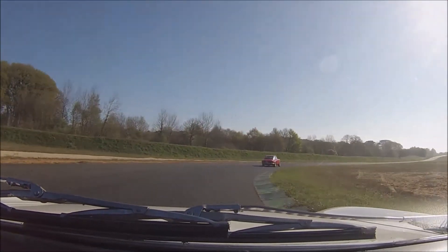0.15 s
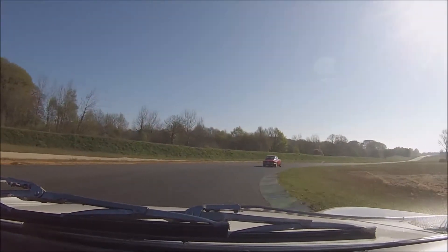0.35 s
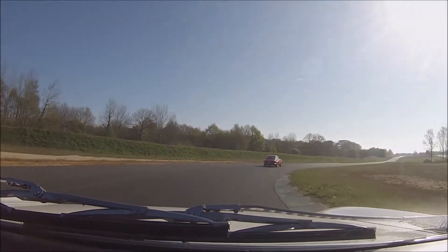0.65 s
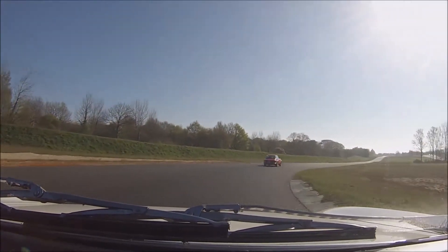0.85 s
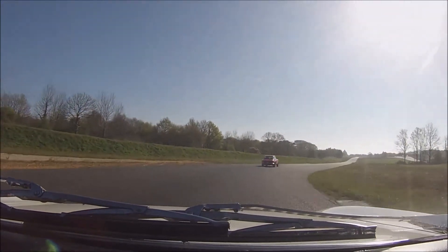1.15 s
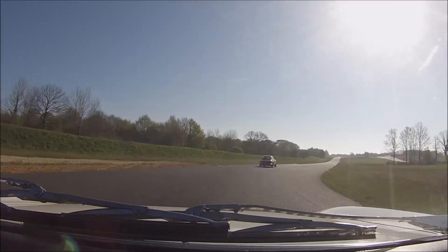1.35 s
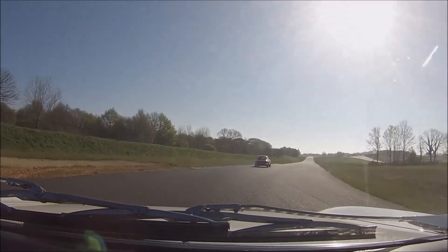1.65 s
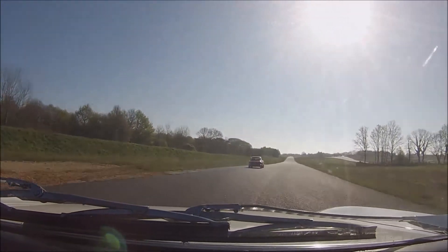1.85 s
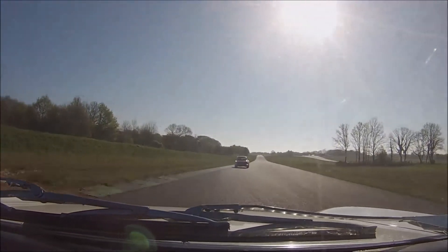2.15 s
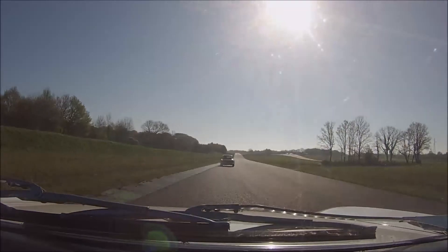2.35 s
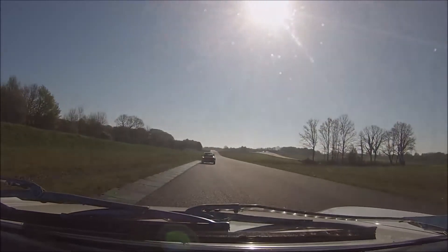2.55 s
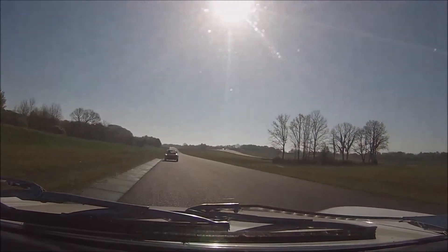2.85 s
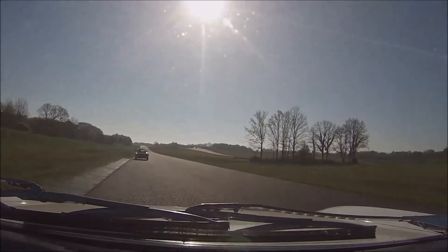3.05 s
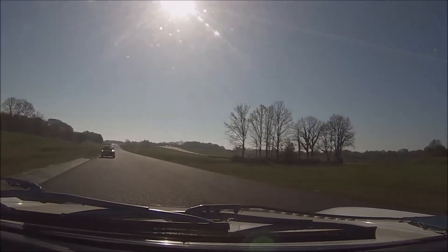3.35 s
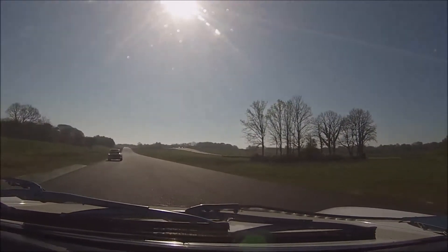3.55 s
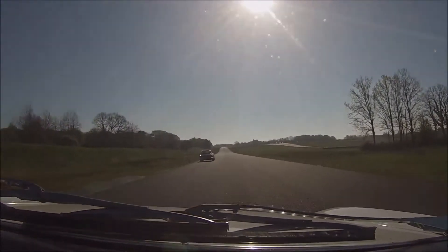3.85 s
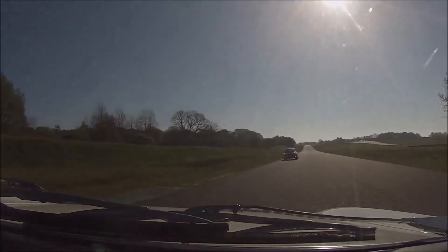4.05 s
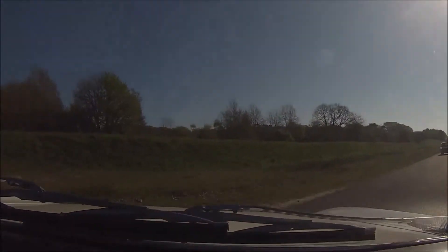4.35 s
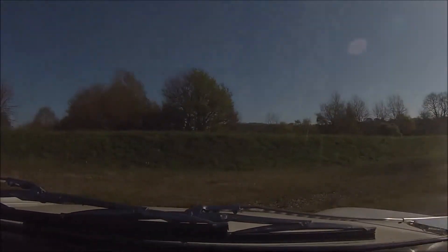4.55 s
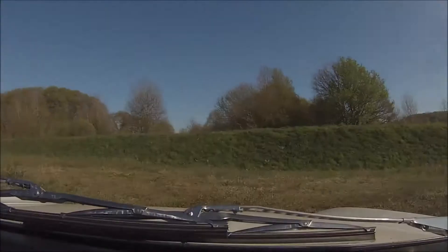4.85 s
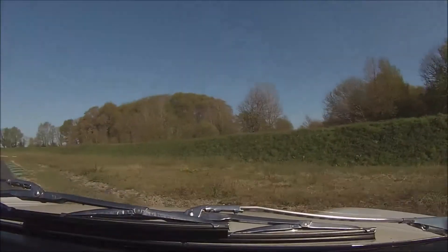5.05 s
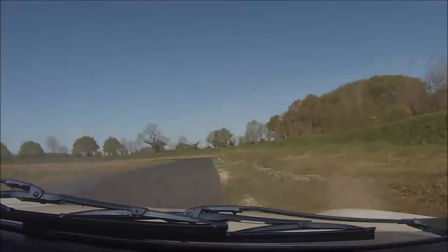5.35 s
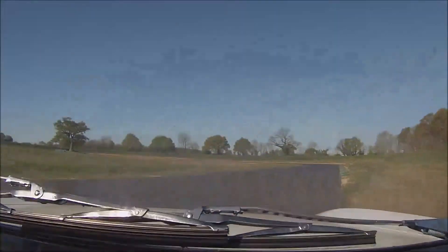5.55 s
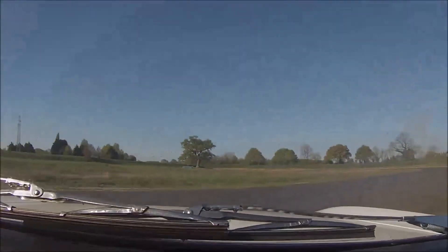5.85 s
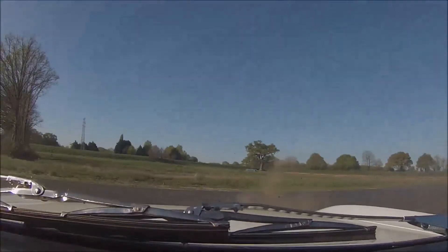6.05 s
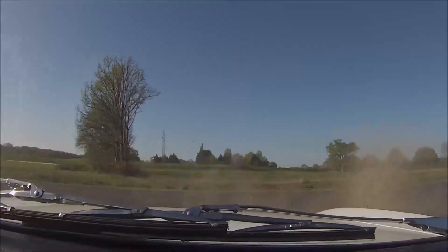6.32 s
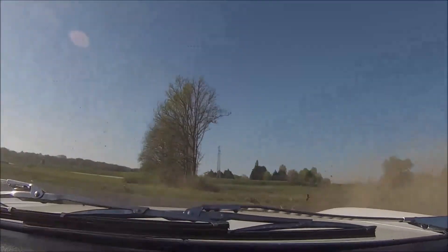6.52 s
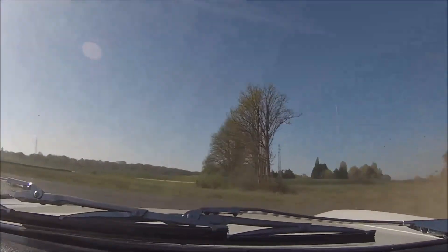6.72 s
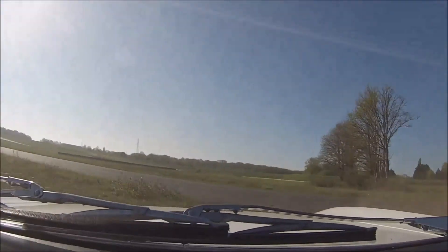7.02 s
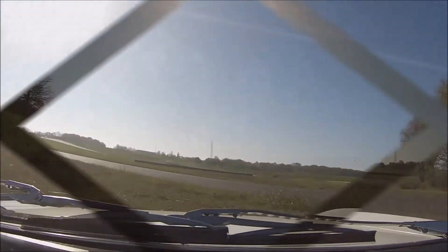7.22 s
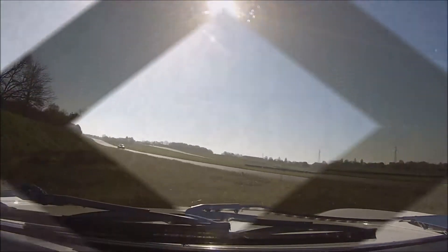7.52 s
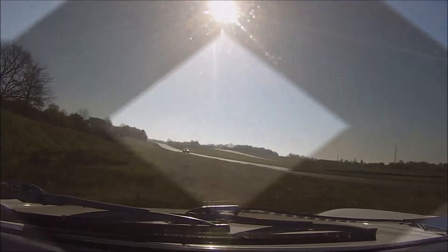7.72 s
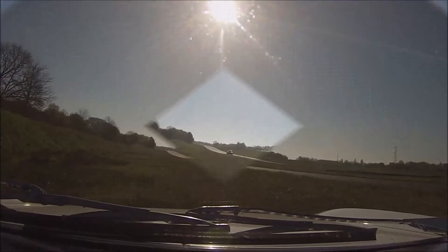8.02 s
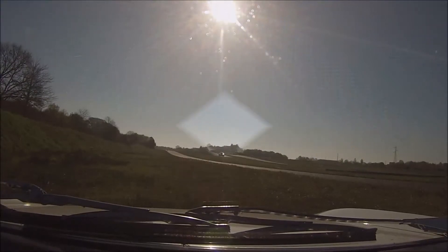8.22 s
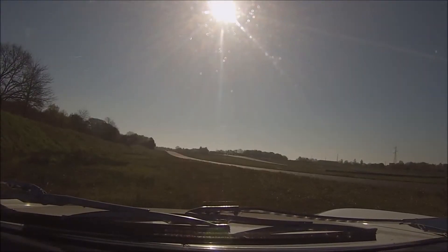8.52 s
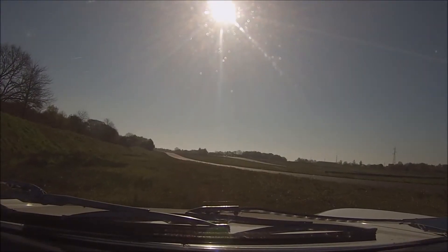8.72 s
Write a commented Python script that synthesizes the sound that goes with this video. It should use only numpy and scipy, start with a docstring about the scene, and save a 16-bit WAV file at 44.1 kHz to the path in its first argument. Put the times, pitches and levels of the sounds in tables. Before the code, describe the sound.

Heard from behind the windscreen of a small sports car on a circuit, a four-cylinder engine climbs steadily over cabin boom and tyre roar. The revs fall, a few knocks sound and the tyres squeal. A short groan leads into a hard jolt as the car slides onto rough ground. Grit patters while a plastic camera housing chatters loudly and close. The engine gives one low rev with light ticking, and a panel hums briefly.

```python
"""A four-cylinder engine climbs and falls, heard from a camera housing behind a car's windscreen.
Its firing note and fluttering weaker orders ride over cabin boom and the roar of tyres on a track.
The tyres stick and slip in a squeal, and the body groans just before the hardest jolt. The car slides
onto rough ground, grit patters and the closed plastic housing chatters in its mount. The engine is
revved once more, a loose part ticks along, and a panel hums at the end."""
import sys
import numpy as np
from scipy import signal
from scipy.fft import rfft, irfft
from scipy.io import wavfile
from scipy.ndimage import uniform_filter1d, minimum_filter1d

SR = 44100
rng = np.random.default_rng(int(sys.argv[2]) if len(sys.argv) > 2 else 0)


def int16_out(signal):
    """Quantize to a 16-bit WAV file."""
    q = np.round(np.clip(np.atleast_2d(signal).T, -1, 1) * 32767)
    wavfile.write(sys.argv[1], SR, q.astype(np.int16))


N = 391608
CONTACT_SAMPLES, ONSET_SAMPLE, LEAD_SAMPLES = 384, 8, 256  # the lead leaves room for filter pre-ring


def gain_of(db):
    """Decibels to amplitude."""
    return 10 ** (np.asarray(db) / 20)


def unit_rms(x):
    """Scales a signal to an rms of 1."""
    return x / np.sqrt(np.mean(x ** 2) + 1e-20)


def curves(rows):
    """A table's start sample, then its columns as sample-by-sample automation."""
    times, *columns = np.transpose(rows)
    start = int(np.clip(times[0] * SR, 0, N))
    t = np.arange(start, min(int(times[-1] * SR), N)) / SR
    return (start, *(np.interp(t, times, column) for column in columns))


def add(mix, start, sound):
    """Lays a sound into the mix from a start sample."""
    part = mix[start:][:len(sound)]
    part += sound[:len(part)]


def place(sounds, times, peak_db, early_samples):
    """A track of one-shots, each set to its peak level and laid just ahead of its cue."""
    track = np.zeros(N)
    for at, sound, db in zip(times, sounds, peak_db):
        add(track, round(at * SR) - early_samples, sound * gain_of(db) / abs(sound).max())
    return track


def wander(size, hz):
    """Smooth random modulation with an rms of 1, mostly slower than hz."""
    drift = signal.lfilter(*signal.butter(2, hz, fs=SR), rng.standard_normal(size + SR))
    return unit_rms(drift[SR:])


def equalise(x, points, peaks=()):
    """Shapes x with an EQ curve and resonant bells."""
    size = x.shape[-1]
    hz = np.fft.rfftfreq(size, 1 / SR)
    point_hz, point_db = np.transpose(points)
    db = np.interp(np.log(hz + 1), np.log(point_hz + 1), point_db, left=-90, right=-90)
    db += sum(lift_db / (1 + (2 * (hz - at) / width) ** 2) for at, width, lift_db in peaks)
    return irfft(rfft(x) * gain_of(db), size)


def soften(x, cutoff_hz):
    """A yielding contact carries little treble."""
    return signal.sosfilt(signal.butter(6, cutoff_hz, fs=SR, output="sos"), x)


def pitched_noise(hz, width_hz):
    """A noise band that follows a pitch curve: shifted down to zero, smoothed and shifted back."""
    carrier = np.exp(2j * np.pi * np.cumsum(hz) / SR)
    pole = np.exp(-np.pi * width_hz / SR)
    band = rng.standard_normal(len(hz)) / carrier
    for _ in range(2):
        band = signal.lfilter([1 - pole], [1, -pole], band)
    return unit_rms((carrier * band).real)


def ringing(modes):
    """Impulse response of dying modes."""
    t = np.arange(4096) / SR
    return sum(gain_of(db - 60 * t / t60) * np.sin(2 * np.pi * hz * t) for hz, db, t60 in modes)


def contacts(count, scatter_s, firmness):
    """One row a hit: a first contact and a brief scatter of smaller ones that swells and dies."""
    t = np.arange(CONTACT_SAMPLES) / SR
    hits = rng.standard_normal((count, len(t))) * np.exp(-t / scatter_s) * np.minimum(t / .001, 1)
    hits /= np.linalg.norm(hits, axis=1)[:, None]
    hits[:, ONSET_SAMPLE] += firmness
    return hits


def bounced(hits):
    """Each hit bounces once, 3-8 ms later and 8-18 dB softer."""
    lateness, strength = rng.random((len(hits), 2)).T
    delay = (SR * (.003 + .005 * lateness)).astype(int)
    index = np.arange(hits.shape[1]) - delay[:, None]
    bounce = np.take_along_axis(hits, np.maximum(index, 0), axis=1) * (index >= 0)
    return hits - gain_of(-18 + 10 * strength)[:, None] * bounce


def struck(hits, modes, detune, spread_db, lift_db=0, grip_s=.004, grip_db=-10):
    """Each hit lands elsewhere, retuning and reweighting the modes; the mount's grip chokes them."""
    hz, db, t60 = np.transpose(modes)
    shift, luck = rng.standard_normal((len(hits), len(hz), 2)).transpose(2, 0, 1)
    t = np.arange(2048) / SR
    envelopes = gain_of(db + lift_db + spread_db * luck)[..., None] * gain_of(-60 * t / t60[:, None])
    detuned_hz = hz * (1 + detune * shift)
    rings = (envelopes * np.sin(2 * np.pi * detuned_hz[..., None] * t)).sum(axis=1)
    choke = gain_of(grip_db * (1 - np.exp(-(t / grip_s) ** 2)))
    fade = np.cos(np.pi / 2 * t / t[-1])
    return signal.fftconvolve(hits, rings * choke * fade, axes=1)


# Sub-bass bed of the cabin air: (time [s], pitch [Hz], relative level [dB])
BOOM = [(0, 49.7, -17.5), (0.551, 42, -13), (0.803, 48.17, -18.5), (1.209, 51.66, -11), (1.35, 51.22, -21),
        (1.599, 56.18, -10), (2.051, 42.06, -14), (2.419, 42.16, -16.5), (2.601, 50.18, -15.5),
        (3.299, 40.92, -13), (3.799, 43.8, -18), (3.91, 40, -5), (3.999, 40.6, -22), (4.33, 43.2, -2),
        (4.6, 44.53, -18.5), (4.8, 48.1, -6), (4.918, 53.08, -18), (5.179, 48.3, -13.5),
        (5.261, 47.63, -13.5), (5.7, 43.55, -14.5), (6.472, 38.24, -17.5), (6.748, 39.27, -11.5),
        (6.998, 45.1, -17.5), (7.3, 48.6, -10.5), (7.621, 41.78, -9), (7.701, 41.77, -27),
        (7.859, 40.94, -7.5), (8.001, 43.95, -17.5), (8.252, 44, -18), (8.48, 44.64, -13.5),
        (8.88, 39.4, -8.5)]


def cabin_boom(trim_db=-3):
    """The cabin air throbs, wavering in pitch and strength; returns the sound and its level curve."""
    times, hz, db = np.transpose(BOOM)
    t = np.arange(N) / SR
    hz, db = np.interp(t, times, hz), np.interp(t, times, db)
    phase = 2 * np.pi * np.cumsum(hz + 2.22 * wander(N, 4.24)) / SR
    swell = unit_rms(gain_of(.5 * np.clip(wander(N, 3.7), -3, 1.3)))
    return np.sqrt(2) * gain_of(db + trim_db) * swell * np.sin(phase), db


# Tyre roar level: swells through the skid, ducks sharply at the hardest jolt, then partly returns:
# (time [s], level [dB])
ROAR_LEVEL = [(0, -34), (0.901, -34), (1.9, -34), (2.3, -36), (2.9, -34.5), (3.6, -38), (3.95, -30.5),
              (4.301, -31.5), (4.8, -30.5), (5.19, -29.5), (5.27, -49.5), (5.6, -37.5), (6.1, -43.5),
              (6.3, -40.5), (7.0, -43.5), (7.35, -36), (7.7, -45.5), (7.9, -38.5), (8.2, -40), (8.88, -43)]
# Low-end EQ of the body rumble: (frequency [Hz], gain [dB])
RUMBLE_EQ = [(15, 1), (28, 6), (38, 7.5), (58, 10), (72, -2.5), (110, -9), (150, -7.5), (237, -7),
             (330, -15), (420, -27), (550, -33.5)]
# Tone of the roar on asphalt: (frequency [Hz], gain [dB])
ASPHALT_EQ = [(250, 3.5), (350, 3.5), (700, -9), (850, -17.5), (1750, -14.5), (2750, -21.5), (3100, -58.5)]
# Its midrange resonances: (centre [Hz], width [Hz], boost [dB])
ASPHALT_PEAKS = [(466, 210, 6.5), (621, 216, 11.5), (1164, 287, 21), (1470, 250, 11), (2010, 210, 8),
                 (2523, 680, 16.5)]
# Duller, less resonant roar off the asphalt: (frequency [Hz], gain [dB])
SOIL_EQ = [(250, 10), (350, -4), (600, 1.5), (900, -16), (1200, -7), (1600, -15), (2000, -15.5),
           (2700, -18.5), (3100, -50)]
# Air hiss on top: (frequency [Hz], gain [dB])
HISS_EQ = [(2500, -2), (2900, 8), (3100, 4), (3500, 10), (3900, 1.5), (5000, -1), (6500, -1.5),
           (7500, -10.5), (9200, -10), (10400, -12), (12000, -19.5), (14000, -23), (16000, -40.5)]


def road_noise(boom, boom_db, off_road_s=6.5):
    """Body rumble, tyre roar and air hiss; the cabin's throb shakes roar and hiss in its rhythm."""
    t = np.arange(N) / SR
    roar_db = np.interp(t, *np.transpose(ROAR_LEVEL))
    shake_db = 6 * boom + wander(N, 22)
    rumble = unit_rms(equalise(rng.standard_normal(N) * gain_of(2.8 * wander(N, 16.5)), RUMBLE_EQ))
    rumble_db = -4 + .23 * boom_db + .26 * roar_db  # partly follows boom and roar
    rush = rng.standard_normal(N) * gain_of(shake_db)
    asphalt = unit_rms(equalise(rush, ASPHALT_EQ, ASPHALT_PEAKS))
    soil = unit_rms(equalise(rush, SOIL_EQ))
    roar = np.where(t < off_road_s, asphalt, soil)
    hiss = unit_rms(equalise(rng.standard_normal(N) * gain_of(.92 * shake_db), HISS_EQ))
    hiss_db = np.minimum(roar_db, -34) - 20.5  # follows the roar up to a ceiling
    return gain_of(rumble_db) * rumble + gain_of(roar_db) * roar + gain_of(hiss_db) * hiss


# Stones thrown up from the verge: (time [s], density [hits/s], relative level [dB])
GRIT = [(5.21, 64, -84), (5.4, 51, -95), (5.6, 140, -65), (5.9, 100, -72), (6.05, 60, -86), (6.15, 97, -62),
        (6.9, 140, -81.5), (6.95, 82, -89), (7.08, 120, -98), (7.25, 200, -65), (7.68, 110, -63.5),
        (7.73, 60, -96), (7.85, 200, -69), (7.93, 60, -82), (8.2, 40, -92)]


def grit_patter(puff_s=.00093):
    """Stones patter at random on the underside, in the colours of the housing's crack and thud."""
    start, density, db = curves(GRIT)
    size = len(db)
    accent_db = 3 * np.minimum(rng.exponential(1, size), 3)
    impacts = gain_of(db + accent_db) * (rng.random(size) < density / SR)
    envelope = signal.lfilter([1], [1, -np.exp(-1 / (puff_s * SR))], impacts)
    puffs = rng.standard_normal(size) * envelope
    body = soften(signal.oaconvolve(puffs, ringing(MOUNT_MODES))[:size], cutoff_hz=1700)
    return start, equalise(puffs, CRACK_EQ, CRACK_PEAKS) + gain_of(17) * body


# Short sprays of grit: (time [s], relative level [dB], 60 dB decay [s], low cut [Hz])
SPRAYS = [(1.775, -52, .05, 3000), (2.652, -45, .05, 3000), (3.749, -41, 0.2, 4500), (3.84, -44.5, 1, 3000),
          (3.95, -30.5, 0.2, 2170), (4.075, -36.5, 0.13, 1904), (4.21, -49, 0.073, 3500),
          (4.455, -56, .08, 4000), (5.123, -47, 0.054, 3000), (5.154, -42, .06, 2200)]


def grit_spray(at, db, t60, low_hz):
    """Grit sprays against the car: a 0.2 s burst of hiss that starts at once and thins out."""
    t = np.arange(SR // 5) / SR
    band = signal.butter(3, [low_hz, 7500], "bandpass", fs=SR)
    burst = signal.lfilter(*band, rng.standard_normal(len(t)))
    sizzle = .085 * np.diff(rng.standard_normal(len(t) + 1))
    return round(at * SR), gain_of(db - 60 * t / t60) * (burst + sizzle)


# Thin metallic accents: (time [s], pitch [Hz], level [dB], 60 dB decay [s])
TINKS = [(3.75, 5877, -39, 0.055), (5.842, 9880, -58, 0.25), (7.896, 9910, -54, 0.31)]


def metal_tink(at, hz, db, t60):
    """A small jolted metal part rings with one dying tone."""
    t = np.arange(SR // 4) / SR
    attack = np.minimum(t / .003, 1)
    return round(at * SR), attack * gain_of(db - 60 * t / t60) * np.sin(2 * np.pi * hz * t)


# Sharp stone hits: (time [s], peak level [dB])
CLICKS = [(3.9499, -29), (5.2066, -42), (5.4555, -39), (5.7209, -32), (6.984, -33), (7.1091, -32),
          (7.2539, -48), (7.4696, -39), (7.86, -30)]
# Their wide, bright tone: (frequency [Hz], gain [dB])
CLICK_EQ = [(3000, -8), (6000, 2), (9000, -7), (13000, -9), (16300, -11)]


def stone_clicks():
    """Small stones hit glass or metal in very short contacts that do not ring."""
    times, db = np.transpose(CLICKS)
    hits = contacts(len(times), scatter_s=.0007, firmness=.5)
    clicks = equalise(np.pad(hits, ((0, 0), (LEAD_SAMPLES, 384))), CLICK_EQ)
    return place(clicks, times, db, LEAD_SAMPLES)


# Ticks of a loose part during the last rev: (time [s], relative level [dB])
TICKS = [(7.9175, -47), (7.9269, -51), (7.9463, -42), (7.9658, -44), (7.9842, -50), (8.0025, -46),
         (8.0196, -46), (8.0371, -49), (8.0552, -48), (8.0693, -53), (8.0833, -44), (8.1026, -44),
         (8.1194, -46), (8.1374, -46), (8.1538, -51), (8.1703, -49), (8.4713, -51)]
# Ring of the bright tick: (frequency [Hz], level [dB], 60 dB decay [s])
TICK_MODES = [(5340, -1, 0.00546), (4528, -4.5, 0.0053), (9900, -22, 0.012), (9200, -6, 0.0061),
              (3300, -12, 0.005), (2030, 6, 0.012)]
# Ring of the duller tock: (frequency [Hz], level [dB], 60 dB decay [s])
TOCK_MODES = [(2030, 1, .013), (2400, -6, .01), (1300, -5, .01), (5000, -21, .005)]


def loose_part(fall_back_s=.0075):
    """A loose part ticks brightly and falls back with a duller, stronger tap."""
    times, db = np.transpose(TICKS)
    tock_db = db + 6 + 3 * rng.standard_normal(len(times))

    def taps(cues, levels_db, modes, scatter_s, firmness):
        track = np.zeros(N)
        for at, level_db, hit in zip(cues, levels_db, contacts(len(cues), scatter_s, firmness)):
            add(track, round(at * SR) - ONSET_SAMPLE, gain_of(level_db) * hit)
        return signal.oaconvolve(track, ringing(modes))[:N]

    ticks = taps(times, db, TICK_MODES, scatter_s=.0006, firmness=.93)
    return ticks + taps(times + fall_back_s, tock_db, TOCK_MODES, scatter_s=.0008, firmness=1)


# Closing hum of a panel: (time [s], pitch [Hz], relative level [dB])
PANEL = [(8.64, 255, -38), (8.69, 246, -27), (8.78, 243.5, -26.5), (8.84, 244, -25), (8.88, 250, -27)]


def panel_hum(octave_db=-23):
    """A panel vibrates on a low note with a little fuzz and a faint octave."""
    start, hz, db = curves(PANEL)
    fuzz = pitched_noise(hz, width_hz=61)
    phase = 2 * np.pi * np.cumsum(hz) / SR
    note = np.sin(phase) + gain_of(octave_db) * np.sin(2 * phase)
    return start, gain_of(db) * (1.25 * note + .45 * fuzz)


# Short rising groan of the body: (time [s], pitch [Hz], level [dB])
GROAN = [(5.06, 176.5, -34), (5.12, 180.5, -30), (5.15, 196, -12.5), (5.17, 201, -12), (5.19, 227.7, -52)]


def body_groan():
    """A short rising groan on one gliding sine, just before the hardest jolt."""
    start, hz, db = curves(GROAN)
    return start, np.sqrt(2) * gain_of(db) * np.sin(2 * np.pi * np.cumsum(hz) / SR)


# Squealing rubber, one table a skid: (time [s], slip rate [Hz], level [dB], octave balance [dB])
SQUEALS = [
    [(4.12, 589.6, -40, 3), (4.25, 591, -30.5, 1), (4.45, 604.7, -37, 6), (4.63, 611.8, -28, -1),
     (4.7, 615, -36.5, 11), (4.73, 604.6, -31, 11.5), (4.77, 602.5, -24, 1), (4.81, 616.4, -29, 0),
     (4.85, 605.3, -26, 5), (4.9, 612, -25, 3.5), (4.97, 612, -27.5, 10.5), (5.0, 616, -24, -1),
     (5.025, 628, -27.5, 6), (5.06, 650, -31, 3), (5.1, 670, -48, 4)],
    [(4.12, 691, -38, -6), (4.25, 700, -34.5, 3), (4.38, 702.7, -34.5, 2), (4.52, 716, -30.5, 0),
     (4.75, 700, -33.5, 4.5), (4.9, 705.5, -38, 4.5), (5.03, 696, -40.5, 9), (5.1, 685, -46, 10)],
    [(5.28, 556.3, -52, -5), (5.31, 567, -35, -22), (5.38, 549, -43, -18)],
]


def tyre_squeal(rows, clean_db=-27.5):
    """Rubber sticks and slips: pitched when loud, turning to a noisy scrub as it gets quieter."""
    start, hz, db, octave_db = curves(rows)
    scrub_share = np.clip(.2 * (clean_db - db), .2, 1)
    phase = 2 * np.pi * np.cumsum(hz + 6 * wander(len(hz), 25)) / SR
    squeal = np.zeros(len(hz))
    for harmonic, width_hz, level_db in [(1, 90, db), (2, 140, db + octave_db), (4, 330, db - 23.5)]:
        slip = np.sqrt(2) * np.sin(harmonic * phase) * gain_of(2.6 * wander(len(hz), 25))
        scrub = pitched_noise(harmonic * hz, width_hz)
        squeal += gain_of(level_db) * (np.sqrt(1 - scrub_share) * slip + np.sqrt(scrub_share) * scrub)
    return start, squeal


# Ring of the plastic shell: (frequency [Hz], relative level [dB], free 60 dB decay [s])
HOUSING_MODES = [(2242, -8.5, 0.063), (2018, -10.5, 0.069), (2083, -9.5, 0.056), (1780, -33, 0.0024),
                 (2520, -15, 0.019)]


def housing_rings(focus_hz, boost_db=17.5, width_hz=160):
    """The plastic rings at each strike, with the modes near that strike's focus lifted."""
    offset_hz = np.transpose(HOUSING_MODES)[0] - focus_hz[:, None]
    lift_db = boost_db / (1 + (2 * offset_hz / width_hz) ** 2)
    hits = bounced(contacts(len(focus_hz), scatter_s=.0011, firmness=1.6))
    rings = struck(hits, HOUSING_MODES, detune=.006, spread_db=3, lift_db=lift_db)
    return soften(rings, cutoff_hz=2660)


# Body of the mount's thud: (frequency [Hz], relative level [dB], free 60 dB decay [s])
MOUNT_MODES = [(1100, -2, 0.041), (1520, -11.5, 0.026), (860, -10, 0.0068), (700, -11.5, 0.0051),
               (535, 3, 0.017), (315, 7.5, 0.013), (127, -0.5, 0.11)]


def mount_thuds(count):
    """The mount answers each strike with a lower thud."""
    hits = bounced(contacts(count, scatter_s=.0015, firmness=1.2))
    return -soften(struck(hits, MOUNT_MODES, detune=.03, spread_db=2), cutoff_hz=1780)


# Tone of the dry crack: (frequency [Hz], gain [dB])
CRACK_EQ = [(2400, 14), (3000, 28.5), (3900, 23), (4700, 25), (5600, 18.5), (6500, 5.5), (7500, 4),
            (9300, 0.5), (10500, -5.5), (12500, -13), (14500, -24), (16500, -39)]
# Its presence peaks: (centre [Hz], width [Hz], boost [dB])
CRACK_PEAKS = [(4870, 500, 3.5), (3860, 760, 3)]


def dry_cracks(count, scatter_s=.0017, buzz_s=.0058):
    """Each contact cracks, and loose parts buzz on briefly after it."""
    t = np.maximum(np.arange(-LEAD_SAMPLES, CONTACT_SAMPLES + 3 * LEAD_SAMPLES), 0) / SR
    buzz = rng.standard_normal((count, len(t))) * np.exp(-t / buzz_s) * np.minimum(t / .002, 1)
    buzz *= gain_of(-10.5) / np.sqrt(scatter_s * SR / 2)  # tucked under the contact's scatter
    hits = bounced(contacts(count, scatter_s, firmness=.041))
    hits = np.pad(hits, ((0, 0), (LEAD_SAMPLES, 3 * LEAD_SAMPLES)))
    return equalise(hits + buzz, CRACK_EQ, CRACK_PEAKS)


# Top-end tone of the metallic snap: (frequency [Hz], gain [dB])
SNAP_EQ = [(6500, -34), (8000, 2.5), (10500, -3), (13000, -13), (16300, -23)]
# Its glint: (centre [Hz], width [Hz], boost [dB])
SNAP_PEAKS = [(9180, 870, 10)]


def metal_snaps(count):
    """A metal part snaps in a tiny burst of high treble."""
    hits = contacts(count, scatter_s=.00064, firmness=.05)
    return equalise(np.pad(hits, ((0, 0), (LEAD_SAMPLES, 3 * LEAD_SAMPLES))), SNAP_EQ, SNAP_PEAKS)


# Cue list of the housing's strikes in its mount:
# (time [s], ring peak [dB], ring focus [Hz], crack peak [dB], thud peak [dB], snap peak [dB])
JOLTS = [(3.8498, -12.5, 2350, -33, -8.5, -54.0), (3.8755, -19.5, 2410, -41, -13, -62),
         (4.079, -22, 2300, -36, -24, -60), (5.2072, 3, 2180, -19, 1.5, -42),
         (5.2334, -33, 2222, -59, -34.0, -83), (5.2515, -19.5, 1990, -46, -21, -81.0),
         (5.42, -3.5, 2143, -31, -5, -60.0), (5.4356, -27, 2024, -41, -11, -69),
         (5.4528, -15.5, 2060, -23.5, -4.5, -47), (5.4669, -18, 2006, -42, -23, -79),
         (5.4822, -18, 1977, -35, -5.5, -42), (5.5473, -24, 2388, -35, -18, -65),
         (5.6152, -11, 2004, -35, -5.5, -46), (5.6307, -17, 2060, -33, -10, -42),
         (5.6454, -19, 2023, -52, -12, -62.0), (5.6553, -18, 2020.0, -46, -27, -51),
         (5.6722, -21, 2056, -40, -15, -64.0), (5.685, -19, 2010.0, -48.0, -19, -72.0),
         (5.6937, -24, 2056, -30, -8.5, -37), (5.7049, -35.0, 2070, -53.0, -34, -58),
         (5.7231, -17, 2540, -14.5, -17, -47.0), (5.7558, -12, 2015, -44, -7.5, -60),
         (5.7658, -17, 1989, -36.0, -10, -43), (5.8405, -9.5, 1995, -34, -10, -53),
         (5.8514, -20, 2056, -35, -7.5, -41), (5.9313, -14, 1996, -40.5, -6, -47.5),
         (5.9433, -13.5, 1998, -25, -7, -42), (5.9556, -22, 2020.0, -39, -11, -56),
         (5.9692, -21, 2000.0, -39, -14.5, -49), (6.016, -19, 2050, -41, -27.0, -68.0),
         (6.0599, -18.5, 2054, -39, -19, -68.0), (6.1215, -19, 1980, -42.0, -16, -67.0),
         (6.1323, -18, 2000, -42, -8, -43), (6.149, -22, 2000, -34, -11, -66.0),
         (6.1609, -10.5, 2034, -26, -9, -47), (6.1737, -17.5, 2040, -33.0, -7, -48),
         (6.1857, -16, 2000, -27, -6.5, -39), (6.1984, -17, 2038, -39, -17, -56),
         (6.2121, -18, 1996, -27, -18, -39), (6.2259, -13.5, 1977, -34, -6, -44),
         (6.2367, -17, 1930, -25, -10, -42), (6.2495, -19, 1980, -35, -26, -65.0),
         (6.2608, -15, 2010, -39, -21, -62.0), (6.2889, -17.0, 2020, -39, -19, -66.0),
         (6.2998, -15, 2060, -38, -12, -53), (6.316, -13.5, 1970, -42, -20, -60.0),
         (6.3288, -7.5, 2095, -34, -3, -41), (6.3415, -20, 2060, -32, -20, -52.0),
         (6.3544, -13.0, 2020.0, -28, -16, -44), (6.3668, -38, 2136, -55.0, -37, -73.0),
         (6.376, -19, 2011, -48, -31, -75.0), (6.3876, -29, 2466, -48, -30, -70.0),
         (6.4001, -4, 2110, -22, -9.5, -59), (6.4146, -15, 2180, -26, -15, -56),
         (6.4439, -31, 2383, -48, -27.0, -69.0), (6.4676, -24, 1970.0, -54, -16, -71.0),
         (6.4775, -22, 2408, -40, -18, -68), (6.4834, -10, 2028, -30, -22, -62.0),
         (6.4979, -17, 2000, -42, -12, -66.0), (6.5112, -14, 1970, -28, -6.5, -39),
         (6.5263, -11, 2030, -35, -14, -68.0), (6.535, -16, 2036, -32, -11, -45.0),
         (6.5458, -27, 2250, -54, -35, -66.0), (6.5581, -10, 2020.0, -32, -25, -63.0),
         (6.5728, -13, 1980, -39.0, -7, -61.0), (6.5843, -22, 1957, -28, -5, -43.0),
         (6.6004, -12, 1972, -34, -12, -66.0), (6.6105, -23, 2003, -40.0, -12, -44),
         (6.639, -13, 2006, -30.5, -15, -62), (6.6495, -15, 2007, -38, -13, -63.0),
         (6.664, -11.5, 1966, -33, -7, -47), (6.6773, -16, 2020.0, -36.0, -13, -73),
         (6.6874, -15, 2101, -37, -10.5, -55.0), (6.7006, -13, 2005, -45, -10, -71.0),
         (6.7117, -15, 2015, -33, -7, -42), (6.728, -11, 2006, -38.0, -10.5, -49.0),
         (6.7406, -11, 2030, -28.5, -2.5, -45), (6.7542, -16, 2020, -36, -18.0, -69),
         (6.7672, -17, 2020.0, -40.0, -13, -52.0), (6.7798, -14, 2010.0, -40, -13, -61),
         (6.7955, -25, 1970, -36, -17, -67.0), (6.8082, -44, 2180, -64, -31, -77),
         (6.8169, -8.5, 2136, -32, -12, -66.0), (6.8543, -11, 2150, -33, -12, -74.0),
         (6.8754, -18, 2065, -31, -12, -61), (6.8867, -12.5, 2007, -33, -12.5, -54),
         (6.9, -12, 2054, -22.5, -8, -53), (6.9137, -15, 1992, -47, -10.5, -65),
         (6.9221, -19, 2013, -35, -10.5, -47), (6.985, -6, 1907, -12.5, -3.5, -26.5),
         (6.9981, -12.0, 1996, -27, -6.5, -48), (7.0123, -10, 2005, -28, -5, -44),
         (7.0273, -15, 2083, -39.0, -12, -65.0), (7.0553, -11, 2000, -34.0, -8, -52.0),
         (7.0998, -13.5, 2040, -28, -9.5, -58.0), (7.1114, -17, 2100, -43.0, -6, -54.0),
         (7.1224, -21, 2180, -29, -9, -37), (7.1358, -17, 2020.0, -33, -10.5, -55.0),
         (7.1479, -14, 2005, -36, -24, -55), (7.1646, -24, 1977, -42, -17, -70.0),
         (7.1744, -15, 2070, -38, -32, -64.0), (7.1897, -10, 2230, -29, -12, -62.0),
         (7.1993, -7, 2030, -26, -11, -56), (7.2114, -16, 2010.0, -31, -23, -63.0),
         (7.2204, -15, 2390, -37, -14, -63.0), (7.2395, -10.0, 2030.0, -21, -8, -50.0),
         (7.2504, -12, 1960, -22, -11, -43.0), (7.2625, -8.5, 1954, -23, -5.5, -35),
         (7.2755, -15, 1985, -46, -19, -63.0), (7.2885, -10.5, 2000, -27, -8.5, -39.0),
         (7.301, -16.0, 2000, -45, -16, -64.0), (7.3116, -16, 2025, -31, -17, -44),
         (7.3242, -12, 2010, -39, -17, -62.0), (7.3409, -9.5, 2022, -28, -18, -56.0),
         (7.3556, -11, 2050, -38, -11, -46.0), (7.3665, -13, 2000, -31, -14, -46),
         (7.3798, -13, 2016, -36, -17.0, -54), (7.3907, -9.5, 1965, -39, -16, -46.0),
         (7.4058, -11, 2197, -35, -25, -54), (7.4258, -5.5, 2005, -21, -10, -46),
         (7.4363, -7.5, 1980, -34.0, -12, -52.0), (7.4512, -11, 2020, -25, -9, -46.0),
         (7.4663, -7.5, 1977, -23, -9, -38), (7.4812, -6, 1964, -25, -5.5, -38),
         (7.4942, -12, 2040, -35.0, -15.0, -46), (7.5095, -11.5, 2014, -36, -22, -57.0),
         (7.528, -28, 2274, -42.0, -30, -54), (7.54, -34, 2266, -38, -32, -62),
         (7.5544, -17, 2334, -42, -15, -47), (7.562, -24, 2204, -42, -11, -62),
         (7.582, -7.5, 2017, -23, -24, -56), (7.5936, -8, 1960, -33, -20, -61),
         (7.6062, -9.5, 2002, -31.0, -9, -46.0), (7.6213, -6.5, 2015, -37, -12, -59),
         (7.6327, -13, 1980, -36.0, -18, -52), (7.6463, -6, 2040, -31, -5.5, -54.0),
         (7.6588, -7, 1950, -21.5, -5.5, -45), (7.6715, -9, 1990, -37.0, -12, -57),
         (7.6879, -10, 2000, -29, -12, -59), (7.7, -35, 2170, -54.0, -41, -62),
         (7.7125, -31, 2410, -51, -34, -68.0), (7.782, -43, 2032, -58, -38, -62),
         (7.8012, -33, 2000, -54, -39, -51), (7.841, -20.5, 2310, -39, -24, -62),
         (7.8571, -17.5, 2350.0, -23.5, -3.5, -43.0), (7.8819, -5.5, 2004, -26, -7, -49),
         (7.8948, -10.5, 2013, -27, -10, -47)]


def housing_chatter(snap_delay_s=.0018):
    """The housing knocks in its mount; each strike layers ring, thud, crack and a slightly late snap."""
    # the hardest jolt trails off in faint, even rebounds
    rebounds = [(at, -43, 2225, -57, -28, -75) for at in np.linspace(5.265, 5.376, 9)]
    times, ring_db, focus_hz, crack_db, thud_db, snap_db = np.transpose(list(JOLTS) + rebounds)
    count, padded_onset = len(times), LEAD_SAMPLES + ONSET_SAMPLE
    rings = place(housing_rings(focus_hz), times, ring_db, ONSET_SAMPLE)
    thuds = place(mount_thuds(count), times, thud_db, ONSET_SAMPLE)
    cracks = place(dry_cracks(count), times, crack_db, padded_onset)
    snaps = place(metal_snaps(count), times, snap_db, padded_onset - round(snap_delay_s * SR))
    return rings + thuds + cracks + snaps


# Engine moves, the long pull and then the last rev:
# (time [s], firing rate [Hz], firing level [dB], weak-order level [dB])
ENGINE_RUNS = [
    [(0, 143.1, -15.5, -26.5), (.4, 145.1, -17.5, -24.5), (.72, 147.9, -26, -27), (1.15, 149.1, -24, -25),
     (1.57, 151.9, -18, -29.5), (2.04, 156.8, -19, -34.5), (2.25, 162.5, -12.5, -30.5),
     (2.43, 166.8, -13.5, -32), (2.6, 172.8, -19, -25.5), (2.92, 181.2, -13, -32),
     (3.15, 183.9, -17.5, -35.5), (3.35, 179, -18.5, -34.5), (3.5, 168.2, -17, -27.5),
     (3.64, 157.5, -16.5, -49), (3.8, 143.2, -20, -29.5), (4.1, 124.8, -30, -34), (4.38, 105.3, -28, -46),
     (4.7, 99.8, -31, -48)],
    [(7.85, 44.6, -12, -50), (7.93, 50.35, -9.5, -45), (8.01, 57.5, -8.5, -48), (8.06, 58.1, -19, -47),
     (8.11, 55, -3, -43), (8.17, 60.7, -16, -44), (8.22, 71.7, -45, -49), (8.31, 85.53, -26, -42),
     (8.41, 90, -27, -33), (8.5, 94.4, -16, -33), (8.6, 90.6, -27, -52), (8.7, 80.6, -56, -63),
     (8.88, 91.1, -53, -45)],
]
# Growl of uneven cylinders: (multiple [x firing rate], offset from weak-order level [dB])
CYLINDER_ORDERS = [(1.75, -9), (2, -3.5), (2.249, -16.5), (2.501, -29)]
# Further weak orders, below the cylinders' growl and played alike: (multiple [x firing rate], offset from weak-
# order level [dB])
LOWER_WEAK_ORDERS = [(.5, 1.5), (.75, -7.5), (1.25, -1), (1.5, 0)]
# Upper orders, heard where they cross a cabin resonance: (multiple [x firing rate], base level [dB])
HIGH_ORDERS = [(2.75, -44), (3, -45), (3.25, -39.5), (3.5, -42), (3.75, -41.5), (4, -45), (4.5, -51),
               (5, -43.5), (5.75, -45.5), (6, -42.5)]
# Cabin resonances that pick them out: (centre [Hz], width [Hz], gain [dB])
CABIN_RESONANCES = [(480, 70, 2), (560, 70, -2), (912, 50, -16)]


def engine(rows, silencer_hz=303, silencer_db_per_hz=-.1306):
    """The cylinders fire in a clean note; weaker orders flutter around it and high ones join at speed."""
    start, hz, db, weak_db = curves(rows)
    size = len(hz)
    phase = 2 * np.pi * np.cumsum(hz * (1 + .0025 * wander(size, 8.4))) / SR
    note = np.sin(phase) * gain_of(db + 1.73 * wander(size, 7.1))
    for order, order_db in CYLINDER_ORDERS + LOWER_WEAK_ORDERS:
        flutter_db = 2.9 * wander(size, 6)
        silencer_db = silencer_db_per_hz * np.maximum(order * hz - silencer_hz, 0)
        partial = np.sin(order * phase + 2 * np.pi * rng.random())
        note += gain_of(order_db + weak_db + flutter_db + silencer_db) * partial
    climb_hz_per_s = uniform_filter1d(np.gradient(hz) * SR, size=8000)
    # the high orders drop out at low revs and off the throttle
    revving = np.clip((hz - 125) / 20, 0, 1) * np.clip(1 + climb_hz_per_s / 25, 0, 1)
    for order, order_db in HIGH_ORDERS:
        resonance = sum(gain_of(lift_db) / (1 + (2 * (order * hz - centre) / width) ** 4)
                        for centre, width, lift_db in CABIN_RESONANCES)
        flutter_db = 3.5 * wander(size, 14)
        phase_drift = .45 * wander(size, 10)
        partial = np.sin(order * phase + phase_drift + 2 * np.pi * rng.random())
        note += revving * resonance * gain_of(order_db + flutter_db) * partial
    return start, np.sqrt(2) * note * signal.windows.tukey(size, .02)


def scene():
    """The mono mix: cabin and road bed, rattles, skids and engine."""
    boom, boom_db = cabin_boom()
    mix = boom + road_noise(boom, boom_db) + housing_chatter() + loose_part() + stone_clicks()
    add(mix, *body_groan())
    add(mix, *panel_hum())
    add(mix, *grit_patter())
    for rows in ENGINE_RUNS:
        add(mix, *engine(rows))
    for rows in SQUEALS:
        add(mix, *tyre_squeal(rows))
    for row in TINKS:
        add(mix, *metal_tink(*row))
    for row in SPRAYS:
        add(mix, *grit_spray(*row))
    return mix[None]


def record(dry, high_cut_hz=16200):
    """Master chain: a limiter with fast attack and slow release, soft saturation, then a high cut."""
    peak_db = 20 * np.log10(abs(dry[0]) + 1e-6)
    release_db = 11 * np.arange(N) / SR  # the held peak falls 11 dB a second
    over_db = np.maximum(np.maximum.accumulate(peak_db + release_db) - release_db, 0)
    look_ahead_db = uniform_filter1d(-minimum_filter1d(-over_db, size=91), size=90)
    limited = dry / gain_of(.54 * look_ahead_db)  # takes off about half the overshoot
    saturated = limited / (1 + limited ** 6) ** (1 / 6)
    high_cut = signal.firwin(511, high_cut_hz, window=("kaiser", 9), fs=SR)
    return signal.oaconvolve(saturated, high_cut[None], "same")


dry = scene()
out = record(dry)
int16_out(out)
```